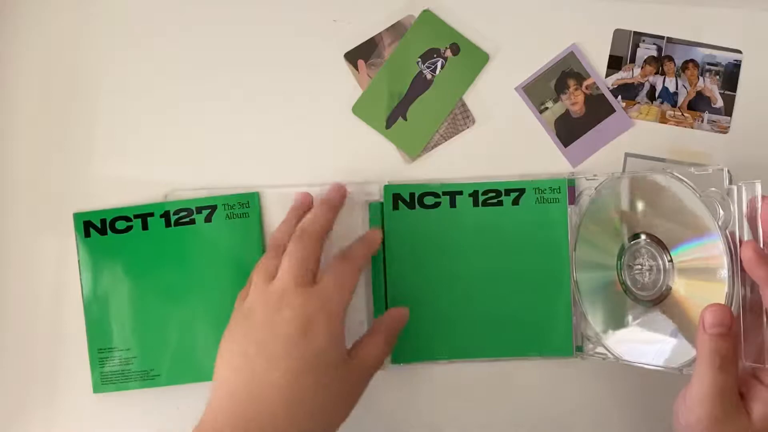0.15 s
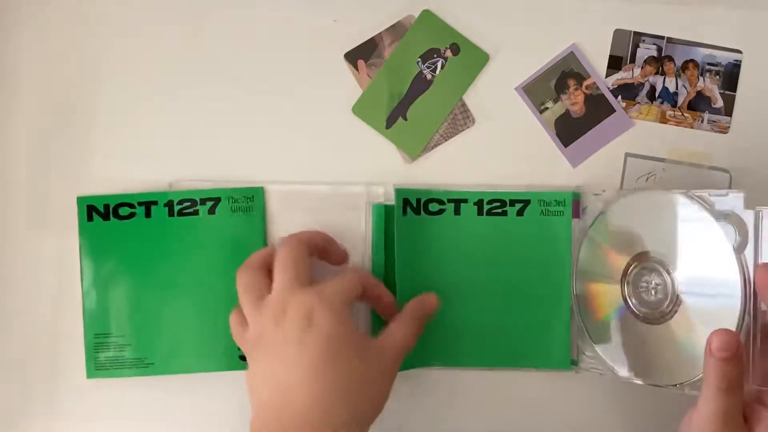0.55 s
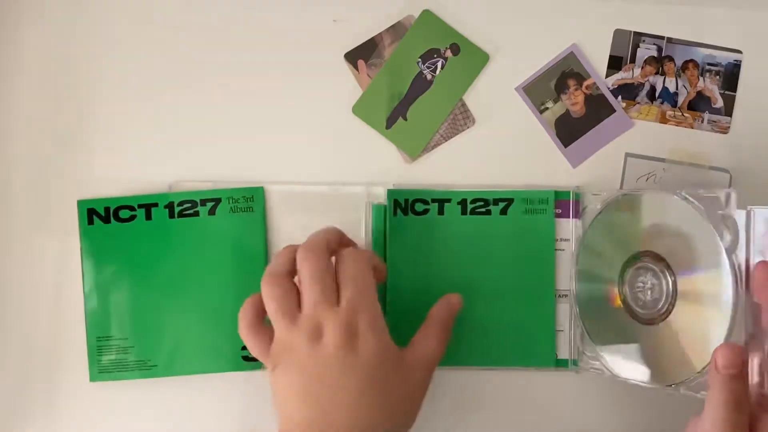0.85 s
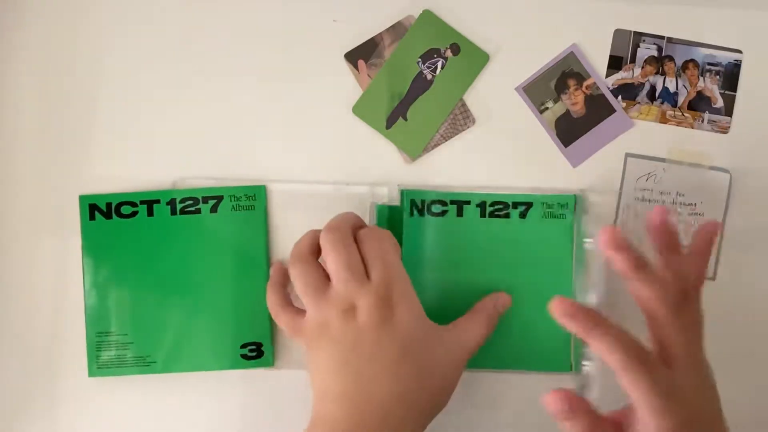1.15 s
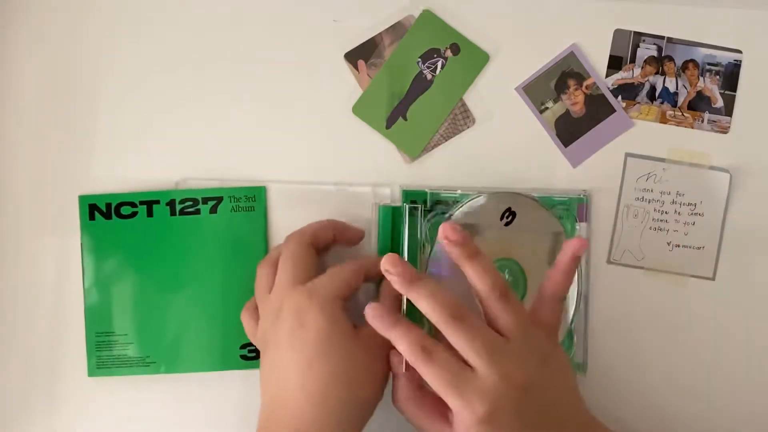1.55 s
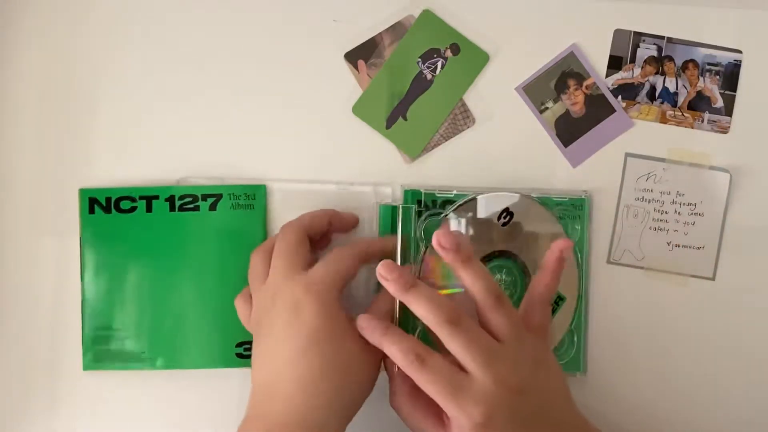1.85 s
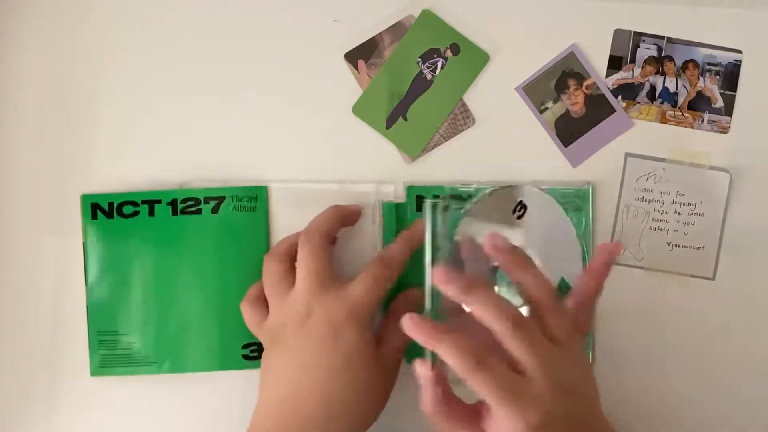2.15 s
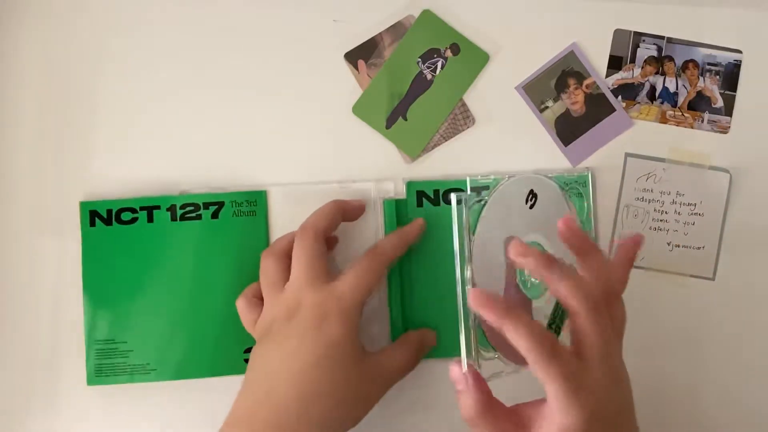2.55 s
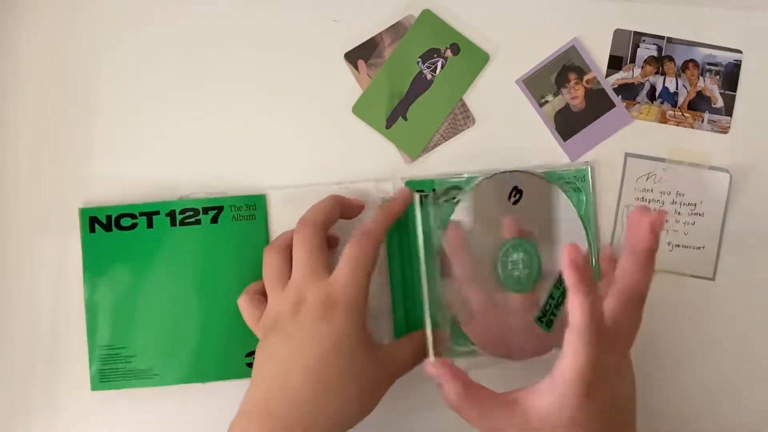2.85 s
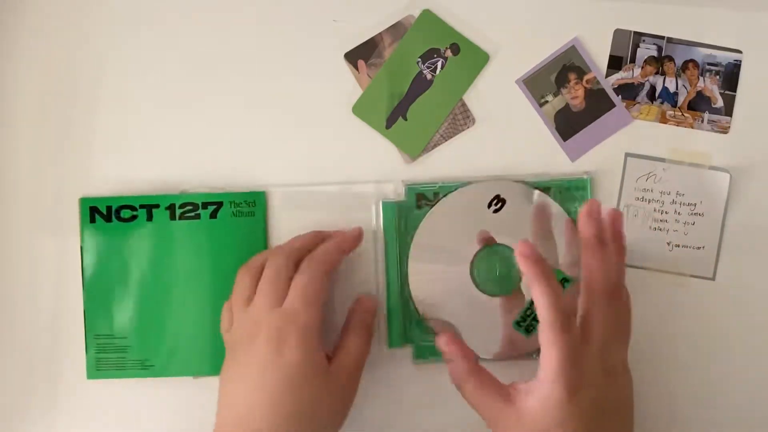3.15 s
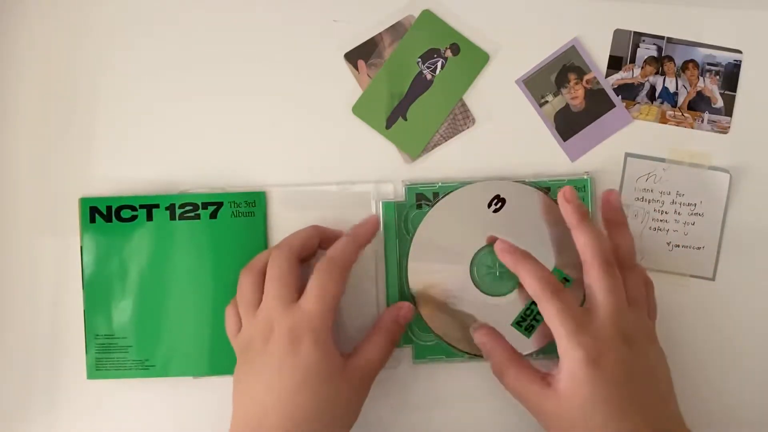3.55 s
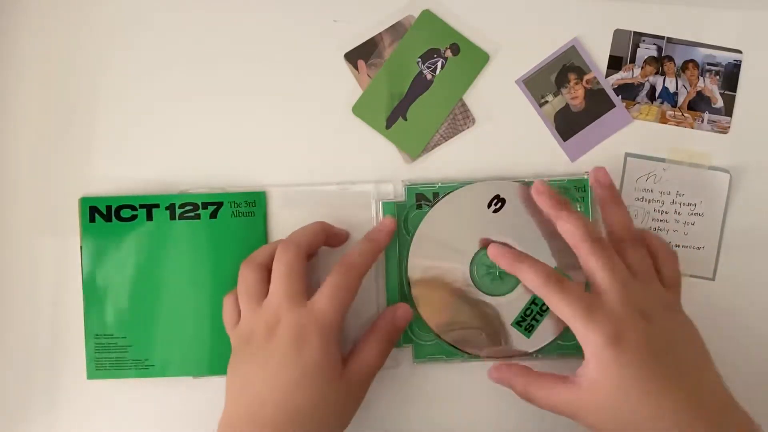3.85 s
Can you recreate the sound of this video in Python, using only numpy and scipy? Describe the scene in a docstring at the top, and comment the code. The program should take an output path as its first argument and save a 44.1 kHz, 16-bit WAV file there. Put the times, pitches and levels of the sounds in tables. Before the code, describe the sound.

A plastic disc case is handled on a table, close up in stereo. Faint finger rubs and small ticks come first, then a brief juddering tray scrape at 1.2-1.5 s. Light rubs and ticks follow, with a soft knock at 2.8. A loud, gritty clap with a low thump lands at 3.0, a faint disc slide at 3.3-3.5, and a sharp double-edged snap around 3.6. Quiet room hum remains.

```python
"""Hands handle a plastic disc case on a table in a quiet room, close to a stereo microphone.
First fingers rub (hiss with a broad squeak) and tick (short noise cracks) on the plastic; soft knocks
thump and rattle. The hinged tray scrapes over as juddering noise, then more rubs, ticks and knocks.
The tray claps down, the disc slides softly, and the tray is pressed home with a snap: gritty noise,
ringing panel modes and a sinking table thump. A last faint knock leaves the hum and rumble of the room."""
import sys
import numpy as np
from scipy import signal
from scipy.fft import rfft, irfft, next_fast_len
from scipy.io import wavfile
from scipy.ndimage import uniform_filter1d, map_coordinates

SR = 44100
rng = np.random.default_rng(int(sys.argv[2]) if len(sys.argv) > 2 else 0)


def to_wav(s):
    """Save 16-bit WAV."""
    ch = np.atleast_2d(s).T  # columns
    pcm = np.round(np.clip(ch, -1, 1) * 32767)  # PCM
    wavfile.write(sys.argv[1], SR, pcm.astype(np.int16))


N = 176400  # samples, 4 s


def amp(db):
    """Decibels to linear gain."""
    return 10 ** (np.asarray(db) / 20)


def unit(x):
    """Scale to rms 1."""
    return x / np.sqrt(np.mean(x ** 2) + 1e-20)


def along(points, hz):
    """Read a curve of (frequency, value) points on a log frequency axis."""
    f, v = np.transpose(points)
    return np.interp(np.log(hz + 1), np.log(f + 1), v)


def clock():
    """Time of each sample in seconds."""
    return np.arange(N) / SR


def short_clock():
    """Time of each sample of a quarter-second blow."""
    return np.arange(SR // 4) / SR


def wobble(rate):
    """A smooth random curve with `rate` knots a second."""
    knots = rng.standard_normal(int(N * rate / SR) + 4)
    return map_coordinates(knots, [clock() * rate])


def filtered(x, response):
    """Filter x by a complex response of frequency, padded so that tails do not wrap round."""
    m = next_fast_len(N + SR // 2)
    return irfft(rfft(x, m) * response(np.fft.rfftfreq(m, 1 / SR)), m)[..., :N]


def resonance(f, hz, width_hz):
    """Causal response of one damped resonance, gain 1 at its peak."""
    return 1j * f * width_hz / (hz * hz - f * f + 1j * f * width_hz)


def noise(colour):
    """Coloured noise of rms 1."""
    return unit(filtered(rng.standard_normal(N), lambda f: amp(along(colour, f))))


def slips(colour, grit_db):
    """Stick-slip friction: noise broken into millisecond grains, rms 1."""
    grains_db = grit_db * np.clip(wobble(900), -2, 2)
    return unit(noise(colour) * amp(grains_db))


def add(track, s, sound):
    """Mix a sound in at time s."""
    part = track[max(0, round(s * SR)):][:len(sound)]
    part += sound[:len(part)]


# catches snapping: start_s, rise_s, hold_s, crack_level_db, panel_level_db, thump_level_db,
# thump_pitch_hz (where the pitch settles)
CATCH_SNAPS = [(2.9606, 0.0013, 0.0024, -41.5, -54.5, -57, 320),
               (2.9939, 0.00643, .008, -21, -34, -13, 298), (3.534, 0.0016, .005, -39.5, -41, -44, 316.6),
               (3.57, 0.0024, .004, -35.5, -36, -27, 308), (3.6025, 0.0042, .004, -19, -23, -14.5, 314.5)]
# tone of the cracking plastic: frequency_hz, level_db
CRACK_COLOUR = [(200, -25.5), (900, -16), (1600, -12), (2500, -7), (3200, -5.5), (3700, -5.5), (4500, -5),
                (5900, -2.5), (7400, -2.5), (8600, 1.5), (10000, -8), (12000, -7.5), (13500, -14.5),
                (15500, -10)]
CRACK_GRIT_DB, CRACK_T60_S = -0.6, 0.04


def snaps():
    """A catch grinds over its edge for some milliseconds, lets go and strikes home."""
    t, force, body = clock(), np.zeros(N), np.zeros(N)
    for s, rise, hold, crack_db, panel_db, thump_db, hz in CATCH_SNAPS:
        since_release = np.maximum(t - s - rise - hold, 0)
        force += np.clip((t - s) / rise, 0, 1) * amp(crack_db - 60 * since_release / CRACK_T60_S)
        add(body, s + rise / 2, amp(panel_db) * panel(rise))
        add(body, s + rise, amp(thump_db) * thump(hz))  # the thump follows one rise time later
    return disc_ring(force * slips(CRACK_COLOUR, CRACK_GRIT_DB)) + body


# high resonances of disc and tray: pitch_hz, width_hz, level_db (relative)
DISC_RESONANCES = [(2637, 50, -3), (3200, 60, -7), (4930, 60, -5), (5110, 50, -4), (5310, 60, 3),
                   (5300, 50, -3), (5870, 60, 6), (6070, 54, -2), (6260, 72, 5.5), (6960, 60, 3.5),
                   (8205, 50, -7), (8780, 33, -0.5)]
DISC_RING_DB = -10  # ringing relative to the raw sound


def disc_ring(x):
    """The raw sound plus the high resonances that it wakes in disc and tray, at the same overall level."""
    def response(f):
        return sum(amp(db) * resonance(f, hz, width) for hz, width, db in DISC_RESONANCES)
    ring = unit(filtered(x, response))
    return unit(x + amp(DISC_RING_DB) * x.std() * ring) * x.std()


# bending modes of the case panels: pitch_hz, level_db (relative), t60_s
PANEL_MODES = [(422.5, -2, 0.064), (541, -6.5, .05), (670, -2.5, 0.11), (835, 2.5, 0.062),
               (1016, 3.5, 0.051), (1180, -6.5, .04), (1364, -5, 0.022), (1535, -7.5, .04),
               (1790, -8, 0.078), (2260, 0, 0.087), (2350, -6, .03), (2550, 5.5, 0.024)]
# tone of the buzzing joints: frequency_hz, level_db
BUZZ_COLOUR = [(150, -23), (300, -8), (620, -2), (780, -11.5), (1020, -2), (1600, -0.5), (2400, -1.5),
               (3300, -4), (6000, -27)]
MODES_DB, BUZZ_DB, BUZZ_T60_S = -8.5, -6.5, 0.095
GRIP_DETUNE = 0.012  # relative spread: the grip shifts the modes from blow to blow


def panel(rise_s):
    """One blow on the case panels: a few damped modes and the buzz of their loose joints."""
    t = short_clock()
    ring = np.zeros(len(t))
    for hz, db, t60 in PANEL_MODES:
        level = amp(db + rng.normal(0, 2) - 60 * t / t60)
        cycles = hz * rng.normal(1, GRIP_DETUNE) * t + rng.random()
        ring += level * np.sin(2 * np.pi * cycles)
    colour = amp(along(BUZZ_COLOUR, np.fft.rfftfreq(len(t), 1 / SR)))
    buzz = unit(irfft(rfft(rng.standard_normal(len(t))) * colour, len(t)))
    buzz = buzz * amp(BUZZ_DB - 60 * t / BUZZ_T60_S)
    return (amp(MODES_DB) * ring + buzz) * np.minimum(t / rise_s, 1)


# partials of the thump: pitch_ratio (multiple of the thump pitch), level_db (relative)
THUMP_PARTIALS = [(.65, -7.5), (.86, 0), (0.999, 2), (1.22, -11), (1.5, -9.5)]
THUMP_T60_S, THUMP_RISE_S = 0.047, 0.0041
THUMP_BEND, THUMP_BEND_S = 0.17, 0.008  # extra share of pitch while flexed, and its relaxing time


def thump(hz):
    """The low, quickly damped answer of case and table; its pitch sinks as the plastic relaxes."""
    t = short_clock()
    cycles = hz * (t + THUMP_BEND * THUMP_BEND_S * (1 - np.exp(-t / THUMP_BEND_S)))
    ring = sum(amp(db) * np.sin(2 * np.pi * ratio * cycles) for ratio, db in THUMP_PARTIALS)
    return ring * amp(-60 * t / THUMP_T60_S) * (1 - np.exp(-t / THUMP_RISE_S))


# the tray scraping round its hinge, before judder and trim: time_s, hiss_level_db, body_level_db
SCRAPE_PATH = [(1.16, -69, -83), (1.219, -55, -63), (1.276, -42.5, -47), (1.313, -42.5, -47),
               (1.38, -45, -56), (1.422, -50, -60.5), (1.47, -58.5, -69), (1.561, -73, -73)]
# tone of its hiss: frequency_hz, level_db
SCRAPE_HISS_COLOUR = [(900, -35), (1700, -14.5), (2100, -9.5), (2450, -5), (2900, -4.5), (3150, -12),
                      (3700, -12.5), (4500, -3.5), (4850, -4.5), (5250, 2), (5750, -4), (6200, -2),
                      (7200, -5.5), (7700, -2.5), (9400, -17), (12000, -6.5), (13500, -16), (15000, -10),
                      (15800, -16.5)]
# tone of the body of sliding plastic, also heard in the rubs: frequency_hz, level_db
SLIDING_BODY_COLOUR = [(100, 5), (200, -8), (330, 7.5), (520, -8), (680, -2), (1050, -9.5), (1500, -14),
                       (2500, -39)]
JUDDER_DB, JUDDERS_PER_S = 1.5, 150


def scrape():
    """The tray drags and judders as it swings over: friction hiss that rings the disc, and a lower body."""
    s, hiss_db, body_db = np.transpose(SCRAPE_PATH)
    judder_db = JUDDER_DB * wobble(JUDDERS_PER_S)

    def level(db):
        return amp(np.interp(clock(), s, db, left=-120, right=-120) + judder_db)
    hiss = disc_ring(level(hiss_db) * slips(SCRAPE_HISS_COLOUR, grit_db=0))
    body = level(body_db) * slips(SLIDING_BODY_COLOUR, grit_db=-0.5)
    return amp(-1.0) * hiss + amp(1.0) * body


# nails and edges ticking on the plastic: start_s, crack_level_db, panel_level_db, crack_t60_s
TICK_HITS = [(0.0623, -49, -80, 0.031), (0.078, -54, -87, 0.014), (0.314, -65, -57, 0.015),
             (0.467, -73.5, -79, 0.027), (0.6133, -48, -59, 0.041), (.655, -50, -64, 0.025),
             (0.7, -79, -65.5, 0.018), (0.8037, -47.5, -52, 0.044), (0.9113, -44, -49.5, 0.045),
             (0.969, -52, -65, 0.055), (1.09, -37.5, -53.5, 0.0087), (1.137, -52.5, -66, 0.059),
             (1.2763, -38.5, -46, 0.017), (1.787, -86, -60.5, .04), (2.1798, -57, -82, 0.015),
             (2.213, -57, -74, 0.012), (2.2775, -47.5, -96, 0.009), (2.354, -55.5, -76, 0.044),
             (2.381, -52.5, -58.5, 0.048), (2.4388, -62, -88, 0.03), (2.675, -56.5, -60.5, 0.025),
             (2.7742, -46, -52, 0.021)]
# tone of the crack: frequency_hz, level_db
TICK_COLOUR = [(300, -53), (1200, -31), (2300, -5), (3800, -1), (6500, 0), (9000, -2), (12000, -5),
               (15500, -18.5)]


def ticks():
    """Light, hard contacts: a short crack and a little panel ring."""
    t, force, body = short_clock(), np.zeros(N), np.zeros(N)
    for s, crack_db, panel_db, t60 in TICK_HITS:
        add(force, s, amp(crack_db - 60 * t / t60))
        add(body, s, amp(panel_db) * panel(rise_s=.001))
    return force * noise(TICK_COLOUR) + body


# strokes of skin and plastic sliding: peak_s, rise_s (last 20 dB up), fall_s (first 20 dB down),
# level_db (before the waver), squeak_pitch_hz, squeak_level_db and body_level_db (both over the hiss)
RUB_STROKES = [(.01, 0.029, 0.033, -68.5, 4870, -13, -11), (.2, 0.22, 0.16, -71.5, 4120, -1.5, -0.5),
               (0.319, 0.08, 0.29, -65.5, 3870, 4.5, -4), (.485, 0.093, 0.1, -57.5, 4720, -3.5, -38),
               (.65, 0.051, 0.092, -58, 3520, -5, -10), (0.743, 0.051, 0.068, -59.5, 3780, -7, -7),
               (.86, 0.063, 0.09, -66, 4500, -19, -12), (0.981, 0.065, 0.036, -62, 6250, -3, -1),
               (1.063, 0.028, 0.021, -61, 4930, -18, -16), (1.15, 0.063, 0.088, -61, 5500, -20, -7),
               (1.621, 0.065, 0.082, -58, 4000, -10.5, -7), (1.833, 0.044, 0.09, -54, 5100, -1, -7),
               (2.091, .16, 0.052, -63, 5300, -6, -6), (2.2, 0.086, 0.04, -70.5, 5200, -7, 2),
               (2.32, 0.12, 0.14, -67.5, 5350, -11, -2.5), (2.453, 0.017, .11, -62, 6200, -9, -6.5),
               (2.691, 0.1, 0.067, -68, 4940, -12, -27), (2.81, 0.047, .15, -62.5, 3350, -5, -2)]
# tone of skin on plastic: frequency_hz, level_db
SKIN_COLOUR = [(300, -63), (1200, -15.5), (2300, -4.5), (3800, -1.5), (7000, 0.5), (9000, -1.5), (11500, 0),
               (13500, -9), (15500, -10)]
RUB_GRIT_DB, RUB_WAVER_DB = 2.5, 3
SQUEAK_WIDTH_HZ = 1300  # of each of the two stacked resonances


def rubs():
    """Each stroke swells and fades, with a friction hiss, a broad resonant squeak and some body."""
    t, out = clock(), np.zeros(N)
    hiss, grains = slips(SKIN_COLOUR, RUB_GRIT_DB), slips(SKIN_COLOUR, RUB_GRIT_DB)
    body = noise(SLIDING_BODY_COLOUR)
    for s, rise, fall, db, hz, squeak_db, body_db in RUB_STROKES:
        distance = np.where(t < s, (s - t) / rise, (t - s) / fall)
        pressure = amp(db - 20 * distance ** 1.31)
        squeak = unit(filtered(grains, lambda f: resonance(f, hz, SQUEAK_WIDTH_HZ) ** 2))
        out += pressure * (hiss + amp(squeak_db) * squeak + amp(body_db) * body)
    return out * amp(RUB_WAVER_DB * wobble(60))


# soft knocks of hand and case on the table: start_s, thump_level_db,
# thump_pitch_hz (where the pitch settles), rattle_level_db
SOFT_KNOCKS = [(0.809, -51, 318.3, -57), (.9895, -38, 339, -36), (1.275, -46, 325, -33),
               (1.357, -41, 287, -47), (1.618, -57.5, 298, -49.5), (2.211, -45.5, 296, -61),
               (2.78, -46.5, 353, -47.5), (2.793, -27.5, 274, -47.5), (2.81, -35.5, 329, -41.5),
               (2.83, -37.5, 298, -49), (3.894, -67, 288, -82.5)]
# tone of the loose case: frequency_hz, level_db
RATTLE_COLOUR = [(100, -19), (190, -3.5), (350, 13.5), (520, 1), (700, -10), (1050, -5.5), (1500, -10.5),
                 (2500, -18), (6000, -47)]
RATTLE_RISE_S, RATTLE_T60_S = 0.0029, 0.054


def knocks():
    """Soft contacts thump the table and make the loose case rattle dully."""
    t, thumps, loose = short_clock(), np.zeros(N), np.zeros(N)
    for s, thump_db, hz, rattle_db in SOFT_KNOCKS:
        add(thumps, s, amp(thump_db) * thump(hz))
        add(loose, s, amp(rattle_db - 60 * t / RATTLE_T60_S) * (1 - np.exp(-t / RATTLE_RISE_S)))
    return thumps + loose * slips(RATTLE_COLOUR, grit_db=0.5)


# the disc sliding under a fingertip: time_s, level_db
SLIDE_PATH = [(3.242, -86), (3.279, -71.5), (3.32, -66), (3.4, -62.5), (3.45, -64), (3.531, -67),
              (3.56, -94)]
# its tone: frequency_hz, level_db
SLIDE_TONE = [(400, -17), (750, -6.5), (1100, -19.5), (1600, -11.5), (2450, -5), (3100, -11), (4300, -5),
              (5100, -2), (5600, -9), (6700, 1), (7600, -9), (9000, -14.5), (12000, -19), (15500, -23.5)]


def slide():
    """The disc shifts softly in its tray: grainy friction noise under a drawn level."""
    s, db = np.transpose(SLIDE_PATH)
    level = amp(np.interp(clock(), s, db, left=-120, right=-120))
    return level * slips(SLIDE_TONE, grit_db=1)


# nearby walls: delay_s, level_db, side (-1 right to 1 left)
WALL_ECHOES = [(.0125, -24.5, .4), (.0215, -18, 0.014), (.0275, -33.5, .5), (.0365, -26.5, -.3),
               (0.045, -24.5, 0.36)]


def walls(x):
    """The first weak reflections, from left and right: delayed, panned copies."""
    def response(f):
        return sum(amp(db) * np.array([[1 + side], [1 - side]]) * np.exp(-2j * np.pi * f * s)
                   for s, db, side in WALL_ECHOES)
    return filtered(x, response)


# decay of the room: frequency_hz, t60_s
ROOM_DECAY = [(150, 0.6), (400, 0.2), (1200, 0.38), (4000, 0.33), (8000, 0.26), (15000, 0.28)]
# stereo width of its tail: frequency_hz, side_level_db
TAIL_WIDTH = [(100, -20), (400, -7), (900, -1), (2500, -8), (6000, -7), (15000, -9)]


def room(x):
    """Diffuse stereo tail: each band stores the sound's energy and lets it die at its own speed."""
    hz, t, z = signal.stft(x, SR, nperseg=512)
    decay = amp(-60 * t[:SR // 512] / along(ROOM_DECAY, hz)[:, None]) ** 2
    decay[:, :2] = 0  # the tail starts two frames late
    decay /= decay.sum(axis=1, keepdims=True)
    power = uniform_filter1d(abs(z) ** 2, size=3, axis=0)  # smoothed across neighbouring bands
    stored = abs(signal.fftconvolve(power, decay, axes=1)[:, :len(t)])
    air = signal.stft(rng.standard_normal((2, N)), SR, nperseg=512)[2]
    tail = air / air.std() * np.sqrt(stored)
    mid, side = signal.istft(tail, SR, nperseg=512)[1][:, :N]
    side = filtered(side, lambda f: amp(along(TAIL_WIDTH, f)))
    return np.array([mid + side, mid - side])


# tone of the room rumble: frequency_hz, level_db
RUMBLE_COLOUR = [(20, -48), (40, -31), (52, -10), (65, 2), (82, -8), (100, -3), (125, -9), (165, -5.5),
                 (230, -11), (320, -17), (450, -25), (700, -39.5), (1500, -44), (5000, -52), (9000, -57.5),
                 (15000, -69.5)]
RUMBLE_DB = -56.5
HUM_DB, HUM_HZ, HUM_WAVER_DB = -57.5, 65.96, 3


def background():
    """A low hum, wavering in level and phase, in the noise rumble of the room."""
    phase = 2 * np.pi * HUM_HZ * clock() + 0.67 * wobble(9)
    hum = unit(np.sin(phase) * amp(HUM_WAVER_DB * wobble(2.3)))
    return amp(HUM_DB) * hum + amp(RUMBLE_DB) * noise(RUMBLE_COLOUR)


ROOM_DB = -12.5


def scene():
    """All handling sounds in the room, over its background."""
    hands = snaps() + scrape() + ticks() + rubs() + knocks() + slide()
    return hands + walls(hands) + amp(ROOM_DB) * room(hands) + background()


# level difference of the microphone ports: frequency_hz, left_minus_right_db
PORT_LEAN = [(150, 0), (380, -1.8), (600, -5), (900, -8), (1250, -6), (1600, -2), (2100, -.4), (3000, 0)]
# phase difference of the ports: frequency_hz, left_lead_rad
PORT_LEAD = [(100, 0), (300, -.25), (650, -.7), (1000, 0), (4800, 0), (6000, .6), (7400, .3), (9200, 2.45),
             (9900, 3.08), (10900, 3.18), (11500, 3.5), (12500, 5), (13400, 6.28)]
LOW_CUT_HZ, TOP_HZ, TOP_ORDER = 45, 15850, 120


def record(dry):
    """The two microphone ports differ in level and phase; the deepest bass and the top treble are cut."""
    def ports(f):
        lean_db = along(PORT_LEAN, f) / 2
        left = amp(lean_db)
        right = amp(-lean_db) * np.exp(-1j * along(PORT_LEAD, f))
        u = 1j * f / LOW_CUT_HZ
        low_cut = (u * u / (1 + u + u * u)) ** 2
        top_cut = 1 / (1 + (f / TOP_HZ) ** TOP_ORDER)
        return np.array([left, right]) * low_cut * top_cut
    return filtered(dry, ports)


dry = scene()
out = record(dry)
to_wav(out)
```